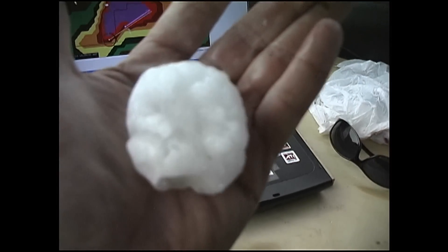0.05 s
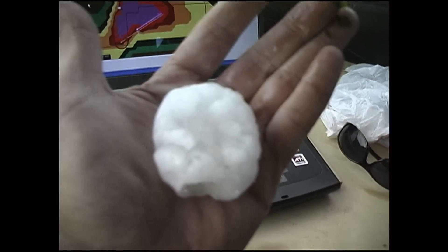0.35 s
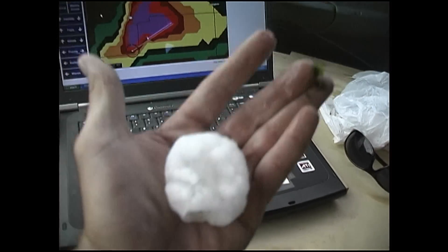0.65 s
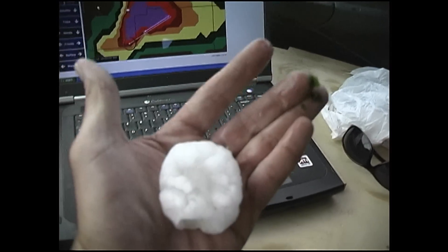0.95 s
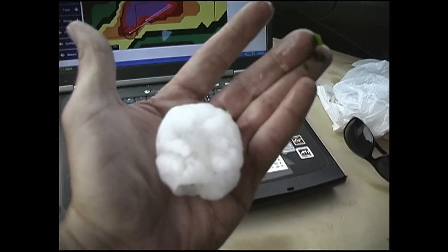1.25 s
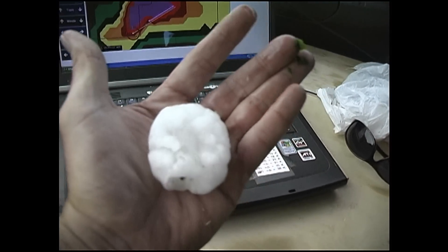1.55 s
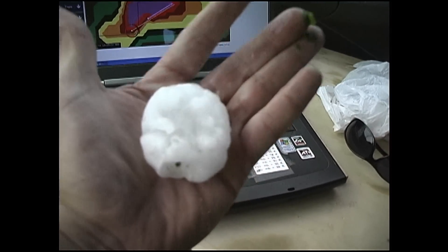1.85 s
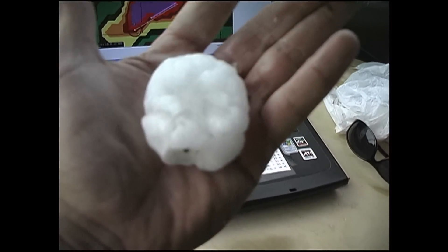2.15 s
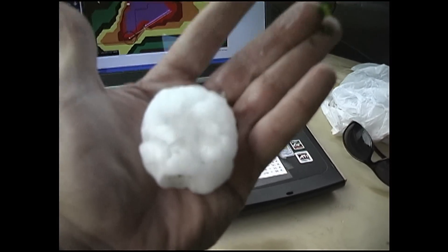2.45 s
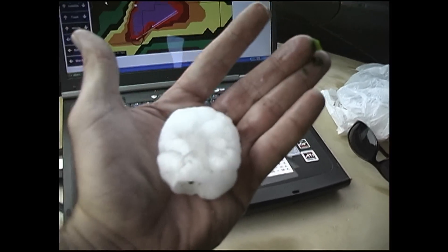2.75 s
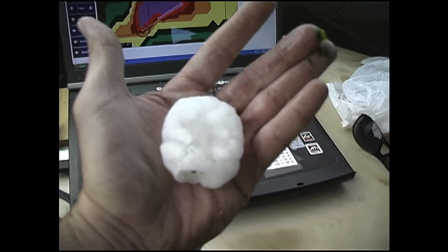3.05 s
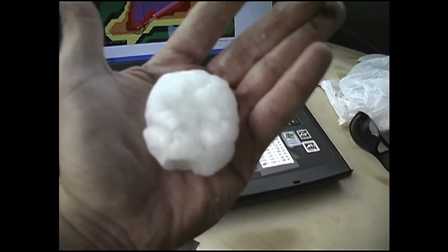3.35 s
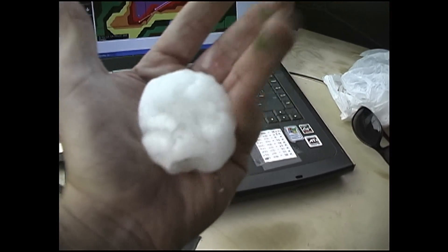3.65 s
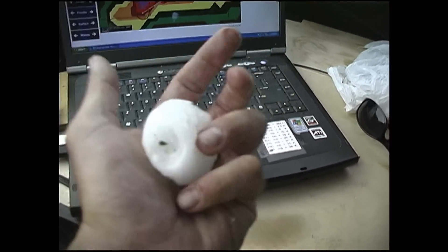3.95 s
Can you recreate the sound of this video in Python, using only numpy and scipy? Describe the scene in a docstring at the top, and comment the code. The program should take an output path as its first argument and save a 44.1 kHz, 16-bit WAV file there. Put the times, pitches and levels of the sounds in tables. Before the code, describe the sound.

Hail patters densely on a parked car, heard from inside the cabin. Stones tick sharply on glass and metal, a few thudding on the roof, while the engine idles and the wipers rumble and thump steadily.

```python
"""Hail patters on a parked car, heard from inside with the engine idling and the wipers running.
Each stone ticks on glass or metal and the small cabin rings briefly; some splinter with a thin snap.
Finer pellets fill the gaps, and a few heavy stones thud on the roof panel.
Underneath lie the cabin's rumble, the engine's throb and drone, and the wipers,
which rumble over the glass and thump at each turn."""
import sys
import numpy as np
from scipy import signal
from scipy.fft import rfft, irfft
from scipy.io import wavfile
from scipy.ndimage import uniform_filter1d

SR = 44100
rng = np.random.default_rng(int(sys.argv[2]) if len(sys.argv) > 2 else 0)


def generate_wav(signal):
    """Clip the signal to [-1, 1] and save it as 16-bit WAV at the path in sys.argv[1]."""
    frames = np.transpose(np.atleast_2d(signal))
    scaled = np.clip(frames, -1, 1) * 32767
    pcm = np.round(scaled).astype(np.int16)
    wavfile.write(sys.argv[1], SR, pcm)


N = 176400

# how alike the two ears are in the cabin: f/Hz, correlation
EAR_LIKENESS = [(30, 1), (130, 0.87), (280, 0.8), (450, -0.055), (650, -0.86), (1100, 0.39), (2700, 0.34),
                (5000, 0.17), (8500, 0.73), (14000, -0.044)]
# stereo lean of the cabin: f/Hz, left-right/dB
CABIN_BALANCE = [(50, 0), (130, 1.5), (260, -3), (500, -3.5), (1100, 2.5), (2500, -1), (4500, 2), (9000, 0)]
# EQ of the cabin rumble: f/Hz, level/dB
RUMBLE_EQ = [(15, -9), (30, 5), (48, 0), (72, -3.5), (105, 1), (150, 1.5), (220, -7.5), (320, -7.5),
             (450, -14), (650, -17), (1200, -15.5), (3000, -18.5), (8000, -44), (15000, -65)]
# blade rumble through one sweep: t/s after the bottom turn, level/dB
SWEEP_ENVELOPE = [(0, -25.5), (.03, -28), (.11, -32), (.17, -48.5), (.4, -40), (.62, -30), (.73, -30),
                  (.82, -53), (1.13, -62), (1.23, -34)]
# EQ of the blade rumble: f/Hz, level/dB
SWEEP_EQ = [(25, -32), (52, -2.5), (85, -5), (130, -1), (220, -9), (350, -18.5), (700, -53), (3000, -80)]
# modes of the wiper thump at the bottom and top turns: f/Hz, level/dB, attack/s, decay/s
BOTTOM_MODES = [(52.5, -15, 0.012, 0.074), (85.4, -22, .008, 0.035), (143.2, -20.5, 0.0051, 0.036),
                (202, -10, 0.0084, 0.013)]
TOP_MODES = [(55, -12, 0.012, 0.023), (99, -37, .01, 0.019)]
# heavy hits on the roof: t/s, level/dB
ROOF_HITS = [(.28, -26.5), (.575, -33.5), (1.202, -28.5), (1.898, -30), (2.681, -35.5), (3.026, -31),
             (3.785, -34)]
# roof panel modes: f/Hz, level/dB, decay/s
ROOF_MODES = [(303, -2, 0.037), (344.6, 2.5, 0.017), (384, 1.5, 0.0083)]
# typical strength of one fine pellet: t/s, level/dB
PELLET_ENVELOPE = [(0, -33.5), (.2, -46.5), (.4, -41), (1.1, -34), (1.6, -36.5), (1.85, -29.5), (2.05, -32),
                   (2.5, -37.5), (3.0, -35.5), (3.3, -35), (4, -37)]
# stones that splinter: t/s, level/dB
SPLINTER_HITS = [(.0181, -32), (.0712, -37), (.2639, -31), (.6016, -25), (.886, -35), (1.034, -36),
                 (1.105, -36), (1.1444, -28), (1.1679, -33), (1.1913, -28), (1.3031, -26), (1.4476, -20.5),
                 (1.5128, -33), (1.5905, -19.5), (1.7764, -24), (1.859, -20), (1.9453, -29), (2.1942, -27),
                 (2.2887, -23), (2.4058, -26), (2.6237, -18), (2.8677, -25.5), (2.9676, -35), (3.235, -22),
                 (3.685, -32), (3.7069, -26), (3.7703, -26)]
# EQ of the ring: f/Hz, level/dB
RING_EQ = [(400, -8.5), (700, -9.5), (1200, -5), (2000, -1), (2700, 6), (3400, 2), (5200, -3), (7000, -8),
           (9500, -12), (11500, -21.5), (13800, -21), (16000, -43)]
# the ring's knock, body and treble ranges: low f/Hz, high f/Hz
RING_RANGES = [(900, 2000), (2200, 5000), (5500, 14000)]
# time constant of the ring: f/Hz, decay/s
RING_DECAYS = [(500, 0.019), (1400, .016), (3000, 0.013), (6000, 0.012), (12000, 0.013)]
# foreground hailstones: t/s, tick level/dB, ring level/dB, knock re ring/dB, treble re ring/dB,
# left-right/dB
HAILSTONES = [(0.0181, -10.5, -32.5, 2, -11.5, 6), (0.0712, -9, -17, -9.5, -5.5, 1),
              (0.0894, -18, -25, -0.5, -4, 2), (0.1435, -20.5, -24.5, -1.5, -11.5, 1),
              (0.2155, -25, -21.5, -4.5, -8, 8), (0.2639, -19.5, -19.5, -6, -4, 0),
              (0.2862, -35, -24, 4, -7, 13), (0.301, -11.5, -15.5, -12.5, -11, 1),
              (0.3483, -15, -21, -11, -12, 2), (0.3781, -20, -22, -12.5, -1.5, 1),
              (0.4324, -12.5, -24, 0.5, -2, 5), (0.4825, -22, -22, -7.5, 0, 6),
              (0.5251, -18, -24.5, -2.5, -14.5, 2), (0.5697, -30, -19.5, -8, -16, 2),
              (0.6017, -16, -22.5, -21, -2, 6), (0.6818, -30, -21.5, -6.5, -12, 5),
              (0.731, -28, -23.5, -13, -12.5, 10), (0.762, -20.5, -32, -9, -22, 11),
              (0.7993, -24.5, -24, -2, -6.5, 4), (0.886, -23, -24, -12, -11.5, 5),
              (0.9344, -29, -29, -3.5, -16, 9), (0.9869, -16.5, -33, -4, -12, 3),
              (1.0198, -26, -23, -1, -11, 5), (1.034, -15.5, -30, -1, -18, 3),
              (1.095, -17.5, -30, -7, -18, 12), (1.1051, -20, -27.5, -19, -3.5, 4),
              (1.1446, -17.5, -29.5, -5, -3, 2), (1.168, -17, -18.5, -7, -7.5, 7),
              (1.3031, -12.5, -23.5, -4.5, -3, 6), (1.3266, -16, -33.5, 5, -3, -3),
              (1.3437, -23, -21, -3, -8.5, 1), (1.3876, -10.5, -18.5, -4, -1.5, 5),
              (1.402, -16, -19, -7, -2.5, -1), (1.4477, -17, -24, -11, -5.5, 6),
              (1.4807, -21, -24, -4.5, -12, 1), (1.5129, -17.5, -21, -15, -5.5, 7),
              (1.5906, -22, -22, -4.5, -3.5, 2), (1.6201, -24, -26.5, -19, -15, -5),
              (1.6564, -18, -18, -21, -22.5, -1), (1.692, -20, -22, -6, -5, -3),
              (1.7069, -25, -20.5, -16, -5.5, 1), (1.7765, -13, -20, -9.5, -7.5, 8),
              (1.8017, -25, -25.5, -27, -4, 5), (1.8591, -13, -26, -22, -2, 6),
              (1.8675, -30, -18, -18, -1, 4), (1.9218, -11, -21.5, -4.5, -8, 5),
              (1.9454, -20, -20.5, -11, -4.5, 13), (1.9978, -12, -22.5, -21, -9.5, 10),
              (2.0248, -21, -27, -6, -1, 1), (2.0469, -16.5, -27, -17, -4, 6),
              (2.0858, -19.5, -23, -18, -11.5, 1), (2.1566, -19, -23.5, -15, -7, 8),
              (2.1945, -7.5, -25, -9, -6, 4), (2.2444, -15, -18, -13, -7.5, 5),
              (2.2887, -11.5, -18, -12.5, -3, 6), (2.3295, -24, -26.5, -7, -8.5, 0),
              (2.3786, -17, -16, -9.5, -16, 5), (2.4058, -29, -26, 1, -1.5, 8),
              (2.4199, -11, -21.5, -8, -9, 1), (2.4688, -17.5, -28.5, -12, -8, 2),
              (2.6001, -19, -25, -5.5, -2.5, 6), (2.6238, -11.5, -22, -8, -3.5, -5),
              (2.6784, -26, -23, -4.5, -3, 8), (2.7395, -12, -20.5, -10, -4, -4),
              (2.7792, -17, -17.5, -10, -3.5, 3), (2.824, -18.5, -29, -18, -5, 1),
              (2.8678, -22, -26.5, -3.5, -7, 11), (2.9676, -16, -23, -11, -9, 3),
              (3.0046, -13, -26.5, -1.5, -8, 13), (3.039, -22, -35, -14, -5, 9),
              (3.0675, -27, -22.5, -9, -16, 5), (3.0855, -33, -32, -19, -10, 8),
              (3.1405, -18, -28, -8.5, -22, 7), (3.1979, -28, -26, -17, -4, 6),
              (3.2147, -12, -14.5, -16.5, -2, -5), (3.2357, -9.5, -22, -17, -5, 7),
              (3.4136, -31, -25.5, -3, -11.5, -4), (3.4911, -33, -20, -15, -7.5, -6),
              (3.5151, -24, -23, -11, -13.5, 6), (3.603, -15, -16.5, -9.5, -13.5, 7),
              (3.6281, -15, -20.5, -11, -9, 2), (3.6848, -21, -30, -1, -4, -1),
              (3.7069, -11, -30, -0.5, -2, 6), (3.7556, -13.5, -19, -12, -8.5, 7),
              (3.7705, -12.5, -28.5, -7, -4.5, 3), (3.7905, -13, -26.5, -1, -29.5, 4),
              (3.8339, -29, -23, -23, -4.5, 1), (3.9178, -15.5, -17.5, -9.5, -4, 0)]

WIPER_PERIOD_S, BOTTOM_TURN_S, TOP_TURN_S = 1.277, .797, 0.26
CRUSH_DB, CRUSH_S = -15, .0016  # a tick above this level crushes the ice, in contacts within this time
TOP_HZ = 16600


def undb(db):
    return 10 ** (np.asarray(db) / 20)


def unit(x):
    return x / np.sqrt(np.mean(x ** 2))


def pan(db):
    """Stereo gains with the left louder by db."""
    return undb(np.array([[db], [-db]]) / 2)


def add(out, start, sound):
    """Mix a sound in at a time in seconds."""
    i = int(min(max(start * SR, 0), N - 1))
    out[..., i:i + sound.shape[-1]] += sound[..., :N - i]


def drift(rate):
    """Smooth random drift with an RMS of 1."""
    k = int(SR / rate)
    steps = np.repeat(rng.standard_normal(N // k + 1), k)
    return unit(uniform_filter1d(uniform_filter1d(steps, k), k)[:N])


def wavering_phase(hz, depth, rate):
    """Phase of a tone whose pitch drifts around hz."""
    return 2 * np.pi * np.cumsum(hz * (1 + depth * drift(rate))) / SR


def on_bins(points):
    """A curve over log frequency, read at every frequency bin."""
    hz, value = np.array(points, float).T
    return np.interp(np.log(np.arange(N // 2 + 1) * SR / N + 1), np.log(hz), value)


def struck_mode(t, hz, attack_s, decay_s):
    """A damped sine with a soft attack and a random phase."""
    envelope = (1 - np.exp(-t / attack_s)) * np.exp(-t / decay_s)
    return envelope * np.sin(2 * np.pi * (hz * t + rng.random()))


def click(hz, length_s, phase):
    """A tiny burst with the energy of one millisecond at level 1; phase in cycles."""
    t = np.arange(SR // 300) / SR
    wave = t * np.exp(-2 * t / length_s) * np.sin(2 * np.pi * (hz * t + phase))
    return wave / np.sqrt(np.sum(wave ** 2) * 1000 / SR)


def cabin_noise(eq):
    """Coloured stereo noise, as alike in both ears as the cabin makes it."""
    alike = np.clip(on_bins(EAR_LIKENESS), -1, 1)
    lean = undb(on_bins(CABIN_BALANCE) / 2)
    mid, side = rfft(rng.standard_normal((2, N))) * undb(on_bins(eq))
    mid, side = mid * np.sqrt(1 + alike), side * np.sqrt(1 - alike)
    return unit(irfft(np.array([(mid + side) * lean, (mid - side) / lean]), N))


def low_swell(peak_s=1.79, width_s=0.11):
    """The deepest rumble swells once, briefly."""
    t = np.arange(N) / SR
    boom = np.sqrt(2) * np.sin(wavering_phase(hz=42, depth=0.091, rate=23))
    return undb(-28.5) * np.exp(-((t - peak_s) / width_s) ** 2) * boom


def engine():
    """The idle throbs at the firing rate under a wavering drone."""
    firing = wavering_phase(hz=24.8, depth=0.0063, rate=2.96)
    throb = undb(-29 + 0.98 * drift(3.8)) * np.sin(firing) + undb(-45) * np.sin(2 * firing)
    drone = undb(-33.5 + drift(7.7)) * np.sin(wavering_phase(hz=157.3, depth=0.00787, rate=6.03))
    return np.sqrt(2) * (throb * pan(db=0.2) + drone * pan(db=-1.0))


def wiper_rumble():
    """The blades rumble over the glass and shudder after each turn."""
    into_sweep = np.arange(N) / SR - BOTTOM_TURN_S
    db = np.interp(into_sweep, *np.array(SWEEP_ENVELOPE).T, period=WIPER_PERIOD_S)
    return undb(db) * cabin_noise(SWEEP_EQ)


def wiper_thumps():
    """The blades thump at the bottom of each sweep and more softly at the top."""
    out, t = np.zeros(N), np.arange(SR // 2) / SR
    for first, modes in ((BOTTOM_TURN_S, BOTTOM_MODES), (TOP_TURN_S, TOP_MODES)):
        for start in np.arange(first, N / SR, WIPER_PERIOD_S):
            for hz, db, attack_s, decay_s in modes:
                detuned_hz = hz * (1 + 0.043 * rng.standard_normal())
                add(out, start, undb(db) * struck_mode(t, detuned_hz, attack_s, decay_s))
    return out * pan(db=-0.5)


def roof_thuds():
    """Heavy stones set the roof panel ringing dully, each at a different spot."""
    out, t = np.zeros(N), np.arange(SR // 4) / SR
    for start, db in ROOF_HITS:
        for hz, mode_db, decay_s in ROOF_MODES:
            spot, detune = rng.standard_normal(2)
            mode = struck_mode(t, hz * (1 + 0.046 * detune), attack_s=0.0016, decay_s=decay_s)
            add(out, start, undb(db + mode_db + 2.0 * spot) * mode)
    return out * pan(db=-7)


def pellets(per_s=105):
    """Fine hail falling at random all over the car, as rows like those of HAILSTONES."""
    count = int(per_s * N / SR)
    starts = (np.arange(count) + 2 * rng.random(count)) / per_s
    size, hard, bright, place = rng.standard_normal((count, 4)).T
    ring_db = np.interp(starts, *np.array(PELLET_ENVELOPE).T) + 3.5 * size
    tick_db = ring_db + 2.5 + 3 * hard
    knock_db, treble_db = np.full(count, -4), -9.5 + 3.9 * bright
    return np.array([starts, tick_db, ring_db, knock_db, treble_db, 3 * place]).T


def splinters():
    """Ice splits on the glass with a needle-thin snap; a window throws it back once to each ear."""
    out = np.zeros((2, N))
    for start, db in SPLINTER_HITS:
        snap = undb(db) * click(hz=10500, length_s=.0001, phase=rng.random())
        add(out, start, snap * pan(db=-2))
        for ear in out:
            add(ear, start + .0016 * rng.random(), snap / 2)
    return out


def clacks(stones, centre_hz=3097, spread_oct=.7, decay_s=0.0058):
    """The struck spot adds three short modes of its own."""
    out, t = np.zeros((2, N)), np.arange(SR // 20) / SR
    for start, _, ring_db, _, treble_db, _ in stones:
        envelope = undb(ring_db - 6.5) * np.exp(-t / decay_s)
        for pitch in rng.uniform(-0.99, 1, size=3):
            hz = centre_hz * 2 ** (spread_oct * pitch + 0.0249 * (treble_db + 8))
            ear_phase = 0.9 * rng.random((2, 1))
            add(out, start, envelope * np.sin(2 * np.pi * (hz * t + ear_phase)))
    return out


def rings(stones, attack_s=0.00081, tail_db=-24.5, tail_s=0.026, scatter_db=3.5, lag_s=0.0021):
    """Pane and cabin ring after each stone, each time in another colour, the treble dying first."""
    out, t = 0, np.arange(SR // 10) / SR
    spectrum, hz = rfft(cabin_noise(RING_EQ)), np.arange(N // 2 + 1) * SR / N

    def noise_band(lo, hi):
        return irfft(spectrum * ((hz >= lo) & (hz < hi)), N)

    # the noise's own level in each range, taken out of the gains below
    knock, body, treble = (10 * np.log10(np.mean(noise_band(*span) ** 2)) for span in RING_RANGES)
    attack = 1 - np.exp(-t / attack_s)
    cabin_tail = undb(tail_db) * np.exp(-t / tail_s)
    edges = np.geomspace(400, TOP_HZ, 14)
    for lo, hi in zip(edges, edges[1:]):
        centre = np.sqrt(lo * hi)
        decay_s = np.interp(centre, *np.array(RING_DECAYS).T)
        hit_power = attack ** 2 * (np.exp(-2 * t / decay_s) + cabin_tail ** 2)
        low = np.interp(centre, [1500, 2600], [1, 0])  # crossfade from knock to body
        high = np.interp(centre, [3600, 7000], [0, 1])  # and from body to treble
        power = np.zeros((2, N))
        for start, _, ring_db, knock_db, treble_db, pan_db in stones:
            tone_db = low * (knock_db - knock) + high * (treble_db - treble) - (1 - low - high) * body
            # each spot on the car stresses other bands, which arrive a little apart
            db = ring_db + 2 + tone_db + scatter_db * rng.uniform(-0.85, 1)
            gain = undb(db) * pan(0.27 * pan_db)
            add(power, start + lag_s * rng.random() ** 2, gain ** 2 * hit_power)
        out = out + np.sqrt(power) * noise_band(lo, hi)
    grain = unit(undb(1.28 * drift(rate=900)))  # reflections arrive in bunches, so the ring is lumpy
    return out * grain


def ticks(stones, centre_hz=4290, spread_oct=0.41, echo_span_s=.008):
    """Each contact clicks and the ice snaps; hard hits crunch, and the windows reflect each stone."""
    out = np.zeros((2, N))
    for start, tick_db, _, _, treble_db, pan_db in stones:
        contacts = int(np.ceil(undb(tick_db - CRUSH_DB) ** 2))
        gain = undb(tick_db) / np.sqrt(contacts) * pan(pan_db)
        for k, (pitch, jitter) in zip(range(contacts), rng.random((2, 10)).T):
            octaves = spread_oct * (2 * pitch - 1) + 0.042 * (treble_db + 7.5)
            tick = undb(-3) * click(centre_hz * 2 ** octaves, length_s=0.00019, phase=jitter)
            snap = undb(-10 + 0.51 * treble_db) * click(hz=8600, length_s=.0001, phase=pitch)
            add(out, start + CRUSH_S * max(k - jitter, 0) / contacts, (tick + snap) * gain)
        echo = (tick + snap / 2) * undb(tick_db - 1)
        for ear in out:
            for late, size in zip(rng.random(size=4), rng.uniform(-1.17, 1, size=4)):
                add(ear, start + echo_span_s * late ** 1.5, echo * size)
    return signal.sosfilt(signal.butter(4, [1200, 11800], "band", fs=SR, output="sos"), out)


def scene():
    """A low bed of car sounds with the hail on top."""
    bed = engine() + wiper_thumps() + wiper_rumble() + roof_thuds() + low_swell()
    rumble = undb(-31.5) * cabin_noise(RUMBLE_EQ)
    hail = np.vstack([HAILSTONES, pellets()])
    return bed + rumble + ticks(hail) + rings(hail) + clacks(hail) + splinters()


def record(dry):
    """Clip the sharpest peaks, roll off the highs and cut the very top."""
    clipped = np.clip(dry, -.85, .85)
    soft = signal.sosfilt(signal.butter(6, 14500, fs=SR, output="sos"), clipped)
    return signal.sosfilt(signal.ellip(8, .2, 80, TOP_HZ, fs=SR, output="sos"), soft)


dry = scene()
out = record(dry)
generate_wav(out)
```